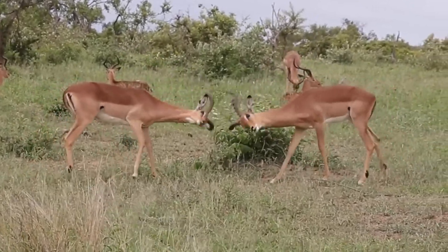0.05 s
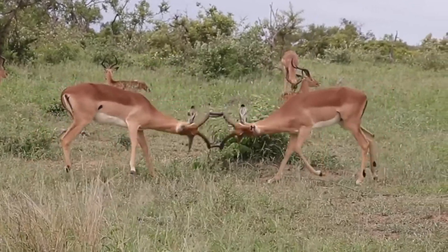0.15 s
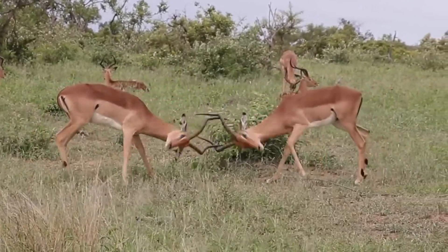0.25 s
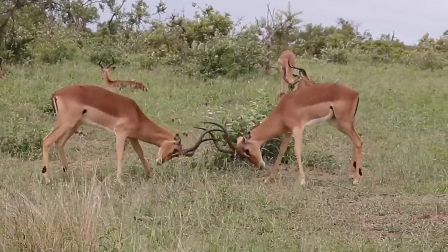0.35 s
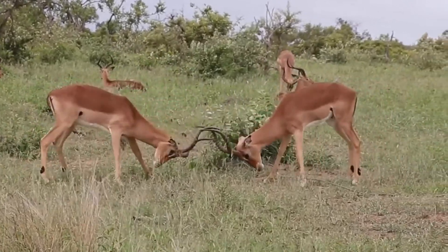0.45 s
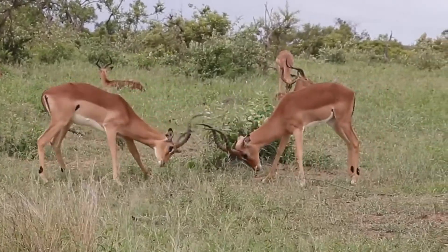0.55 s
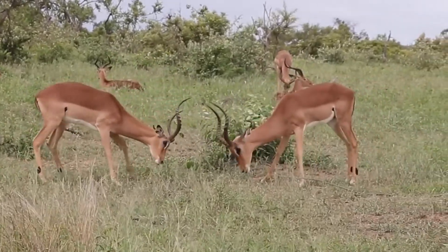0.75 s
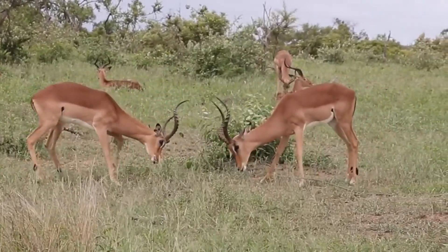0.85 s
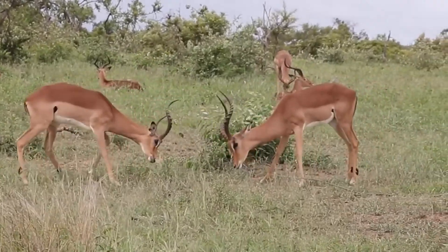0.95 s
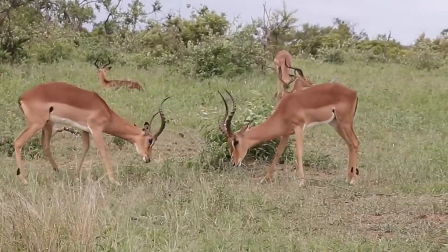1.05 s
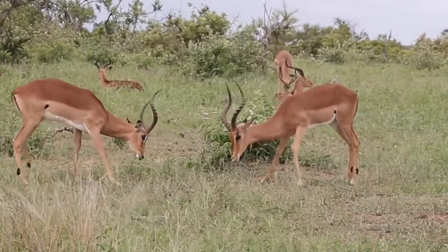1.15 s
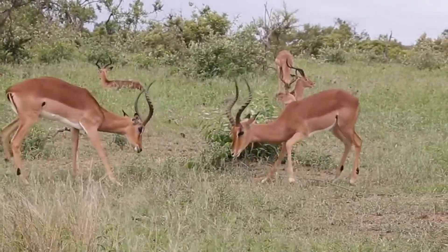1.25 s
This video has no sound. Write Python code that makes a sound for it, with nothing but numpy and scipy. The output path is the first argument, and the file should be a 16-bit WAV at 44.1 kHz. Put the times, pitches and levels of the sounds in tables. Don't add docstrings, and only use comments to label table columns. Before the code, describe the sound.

Antelope horns clash with a quick burst of hard dry clacks, then a lighter gritty scrape

```python
import sys
import numpy as np
from scipy import signal
from scipy.fft import rfft, irfft, next_fast_len
from scipy.io import wavfile
from scipy.ndimage import uniform_filter1d, map_coordinates

SR = 44100
rng = np.random.default_rng(int(sys.argv[2]) if len(sys.argv) > 2 else 0)


def unload_audio(sound):
    columns = np.transpose(np.atleast_2d(sound))
    steps = np.round(np.clip(columns, -1, 1) * 32767)
    wavfile.write(sys.argv[1], SR, steps.astype(np.int16))


def invert_db(level):
    return 10 ** (np.asarray(level, dtype=float) / 20)


N = 57330


def unit(x):
    return x / np.sqrt(np.mean(x ** 2) + 1e-20)


def along(points, hz):
    f, value = np.transpose(points)
    return np.interp(np.log(hz + 1), np.log(f + 1), value)


def over_time(points):
    s, db = np.transpose(points)
    return np.interp(np.arange(N) / SR, s, db)


def wobble(rate):
    knots = rng.standard_normal(int(N * rate / SR) + 4)
    return map_coordinates(knots, [np.arange(N) * rate / SR])


def filtered(x, response):
    m = next_fast_len(N + SR // 4)
    return irfft(rfft(x, m) * response(np.fft.rfftfreq(m, 1 / SR)), m)[..., :N]


def air():
    # (frequency [Hz], density [dB per Hz])
    air_colour = [(59, -81), (100, -47.5), (267, -48), (670, -22.5), (729, -18), (1140, -4.5), (2800, -1),
                  (15100, -21), (16500, -31.5)]
    # (frequency [Hz], correlation [0-1])
    likeness = [(100, .8), (500, 0.18), (2000, .4), (5000, 0.12), (9000, 0.21)]
    level_db, fade_db_per_s, lag_s = -53.5, -0.14, 0.00021

    z = signal.stft(rng.standard_normal((2, N)), nperseg=512)[2]
    patches = uniform_filter1d(rng.standard_normal(z.shape[1:]), 8, 0)
    patches = unit(uniform_filter1d(patches, 8, 1))
    pair = signal.istft(z * invert_db(1.8 * patches), nperseg=512)[1][:, :N]

    def mid_and_side(hz):
        turn = np.arccos(np.clip(along(likeness, hz), -1, 1)) / 2
        return invert_db(along([(10, -70)] + air_colour, hz)) * [np.cos(turn), np.sin(turn)]

    mid, side = filtered(pair, mid_and_side)
    early_late = np.array([[1], [-1]])
    wide = filtered(np.array([mid + side, mid - side]),
                    lambda hz: np.exp(1j * np.pi * hz * lag_s * early_late))
    return unit(wide) * invert_db(level_db + fade_db_per_s * np.arange(N) / SR + 0.35 * wobble(2.3))


def grass():
    # (time [s], level [dB])
    shuffle = [(0, -69), (0.089, -70), (0.129, -49), (0.201, -61), (.33, -48.5), (.45, -60), (0.528, -58),
               (0.578, -43.5), (0.619, -59.5), (.9, -61), (1.3, -70.5)]
    # (frequency [Hz], density [dB per Hz])
    grass_colour = [(500, -44.5), (1200, -12.5), (2200, -2.5), (3200, -5), (5000, -14), (12000, -33)]
    grains_per_s, spread_db = 2500, 3

    hits = rng.random((3, N)) < grains_per_s / SR
    grains = hits * rng.standard_normal((3, N)) * invert_db(spread_db * rng.standard_normal((3, N)))
    bed = unit(grains[:2] + .8 * grains[2])
    bed = bed + 1.1 * rng.standard_normal((2, N))
    edges = [(50, -90)] + grass_colour + [(20000, -62)]
    brushed = unit(filtered(bed, lambda hz: invert_db(along(edges, hz))))
    return brushed * invert_db(over_time(shuffle) + 3.0 * wobble(40))


def surroundings(x):
    # (frequency [Hz], decay by 60 dB [s])
    shrubs = [(1000, .13), (3000, .11), (5000, .07), (12000, .03)]
    shrubs_db = -21
    ground_s, ground_db, ground_hz = .0037, -22, 7000

    def soil(hz):
        delay = np.exp(-2j * np.pi * hz * ground_s)
        return invert_db(ground_db) * delay / (1 + 1j * hz / ground_hz) ** 2

    hz, t, z = signal.stft(rng.standard_normal((2, SR // 4)), SR, nperseg=128)
    tail = signal.istft(z * invert_db(-60 * t / along(shrubs, hz)[:, None]), SR, nperseg=128)[1]
    tail = tail / np.linalg.norm(tail[0])
    scatter = signal.fftconvolve(x, tail, axes=1)[:, :N]
    return filtered(x, soil) + invert_db(shrubs_db) * scatter


def clacks(rows, ring_db, crack_hz):
    # (frequency [Hz], level [dB], decay by 60 dB [s])
    horn_modes = [(560, -31, .025), (1300, -31, .022), (2700, -28, .018), (3900, -31, .02),
                  (5600, -30, .014), (7600, -34, .012)]
    ring_spread, ring_rise_s, crack_t60_s = .05, 0.00019, .003
    after_db, after_t60_s = -19, .014
    left_lag_s, left_rings = 2.3e-5, 1.1

    out, cracks, size = np.zeros((2, N + SR)), np.zeros((2, N + SR)), 2048
    for s, db, hz, cycles, crack_db in rows:
        start = int(s * SR)
        span = slice(start, start + size)
        t = np.arange(size) / SR - (s - start / SR) - np.array([[left_lag_s], [0]])
        t = np.maximum(t, 0)

        u = t * hz / cycles / np.array([[left_rings], [1]])
        u = np.minimum(u, 1)
        touch = np.sin(np.pi * u ** 0.78) ** 1.37
        hum = invert_db(after_db - 60 * t / after_t60_s) * u
        knock = (touch + hum) * np.sin(2 * np.pi * hz * t)

        ring = np.zeros((2, size))
        for f, level, t60 in horn_modes:
            a, b, c = rng.standard_normal(3)
            phase = 2 * np.pi * f * (1 + ring_spread * b) * t + c * np.array([[.5], [-.5]])
            ring += invert_db(level + 2.1 * a - 60 * t / t60) * np.sin(phase)
        ring *= 1 - np.exp(-t / ring_rise_s)
        out[:, span] += invert_db(db) * (knock + invert_db(ring_db) * ring)

        noise = rng.standard_normal((3, size))
        burst = (t > 0) * (noise[2] + .5 * noise[:2])
        cracks[:, span] += invert_db(db + crack_db - 60 * t / crack_t60_s) * burst

    def dull(f):
        return 1 / (1 + 1.5j * f / crack_hz - (f / crack_hz) ** 2) ** 2

    return out[:, :N] + filtered(cracks[:, :N], dull)


def snaps():
    # (time [s], peak [dB], pitch [Hz], contact [cycles], crack [dB])
    stems = [
        (.0755, -46, 2800, 3, -20),
        (.0914, -39, 4000, 2, -10),
        (.0925, -41, 2800, 2.5, -10),
        (.0935, -37, 2200, 2.5, -14),
        (.4760, -46, 3000, 2, -10),
        (1.0678, -41, 2700, 2, -14),
    ]
    return clacks(stems, ring_db=-5, crack_hz=6000)


def grind():
    # (time [s], level [dB])
    pressure = [(.232, -91), (.238, -49.5), (.27, -50), (.29, -50), (.335, -56), (.36, -90), (.53, -90),
                (0.544, -54.5), (0.579, -41), (.597, -53), (.615, -88)]
    # (frequency [Hz], density [dB per Hz])
    grit_colour = [(800, -35), (2000, -5), (4500, -3.5), (7500, -8), (10000, -19), (14000, -54)]
    grains_per_s = 1800

    grit = (rng.random((3, N)) < grains_per_s / SR) * rng.standard_normal((3, N))
    pair = grit[2] + .5 * grit[:2]
    rubbed = unit(filtered(pair, lambda hz: invert_db(along(grit_colour, hz))))
    return rubbed * invert_db(over_time(pressure))


def scrape():
    # (time [s], peak [dB], pitch [Hz], contact [cycles], crack [dB])
    touches = [(.5352, -38, 4500, 2, -6), (.5444, -30, 4500, 1.5, -2), (.5450, -36, 2800, 2, -10),
               (.5495, -30, 3900, 5, -9), (.5618, -25, 4600, 2.2, -4), (.5628, -30, 3000, 4, -14),
               (.5695, -34, 4500, 2.5, -6), (.5710, -35, 3500, 2, -8), (.5748, -31, 3500, 2.5, -10),
               (.5756, -24, 4500, 2.4, -10), (.5772, -27, 3000, 1.6, -8), (.5778, -31, 1800, 5, -14),
               (.5805, -34, 4000, 3.5, -8), (.5822, -31, 6100, 7, -10), (.5836, -29, 3500, 3, -10),
               (.5850, -35, 2500, 3, -10), (.5920, -30, 3900, 6, -14)]
    return clacks(touches, ring_db=12, crack_hz=7600)


def clash():
    # (time [s], peak [dB], pitch [Hz], contact [cycles], crack [dB])
    blows = [(.23372, -2.5, 5300, 2.9, -15), (.23378, -9, 3500, 2.5, -30), (.23425, -7.5, 7200, 1.8, -5),
             (.2488, -31, 4500, 3, -20), (.25627, -10.5, 4400, 2.4, -20), (.26372, -5, 4400, 2.4, -20),
             (.2733, -36, 4500, 3, -14), (.28042, -2, 5400, 1.9, -16), (.2807, -1, 4000, 3.2, -26),
             (.2813, -10, 5000, 2.5, -24), (.28165, -8, 3200, 2.1, -26), (.2843, -20, 4800, 4, -30),
             (.29275, -11.5, 4800, 6.5, -24), (.2932, -27, 2300, 9, -30), (.2990, -25, 4500, 3.5, -24),
             (.31155, -13, 3700, 2.7, -18), (.3249, -19.5, 3700, 2.7, -20), (.3315, -38, 2900, 7, -24),
             (.3370, -40, 3600, 6, -24), (.3550, -41, 2600, 2.5, -20), (.3690, -34, 1500, 4, -14),
             (.4054, -25, 3100, 1.3, -24), (.4085, -39, 4000, 4, -16)]
    return clacks(blows, ring_db=2.0, crack_hz=10800)


def scene():
    air_left_db, horns_left_db, cut_hz = 1.3, .8, 1200
    lean = np.array([[.5], [-.5]])
    horns = (clash() + scrape() + grind()) * invert_db(horns_left_db * lean)
    near = horns + surroundings(horns) + snaps()
    near = filtered(near, lambda hz: (1j * hz / (1j * hz + cut_hz)) ** 4)
    return near + (air() + grass()) * invert_db(air_left_db * lean)


def top_cut(x):
    return signal.sosfilt(signal.butter(12, 16820, fs=SR, output="sos"), x)


def record(dry):
    top_hz = 16300
    mix = filtered(dry, lambda hz: 1 / (1 + (hz / top_hz) ** 40))
    return top_cut(mix)


dry = scene()
out = record(dry)
unload_audio(out)
```